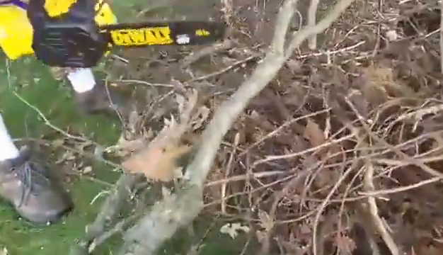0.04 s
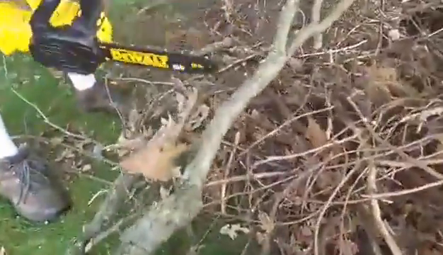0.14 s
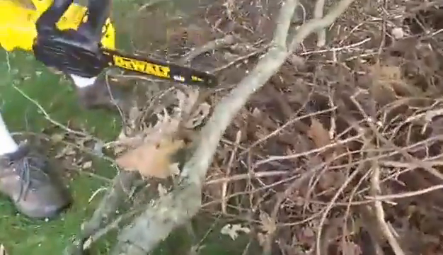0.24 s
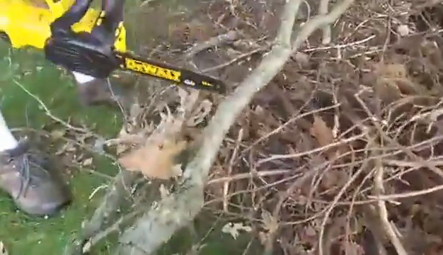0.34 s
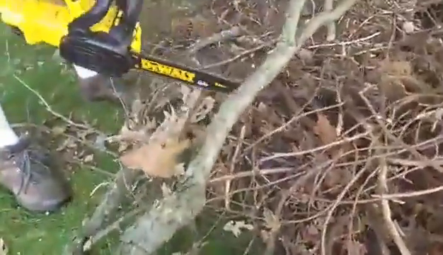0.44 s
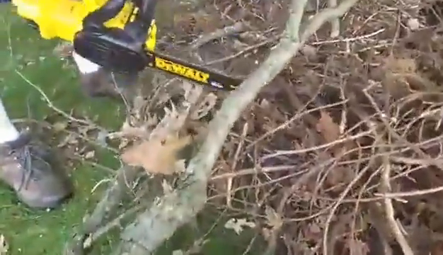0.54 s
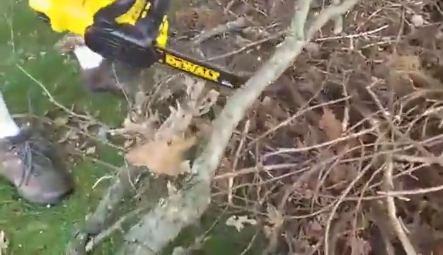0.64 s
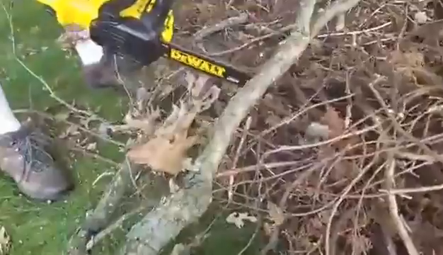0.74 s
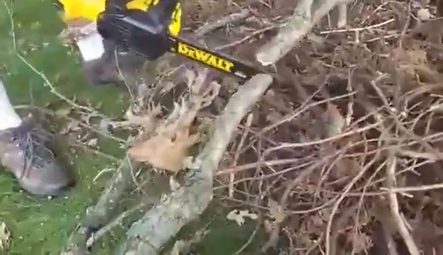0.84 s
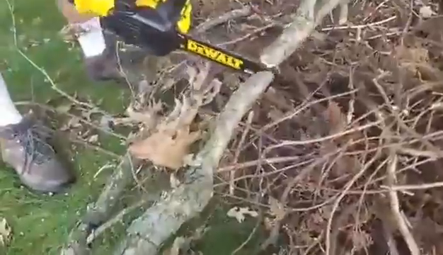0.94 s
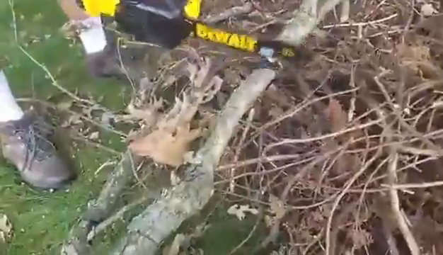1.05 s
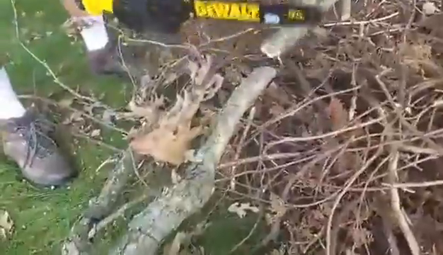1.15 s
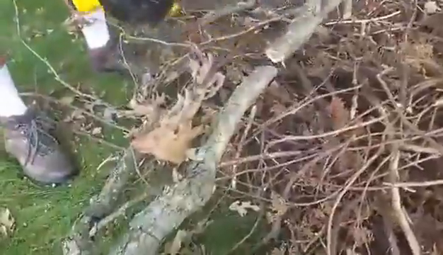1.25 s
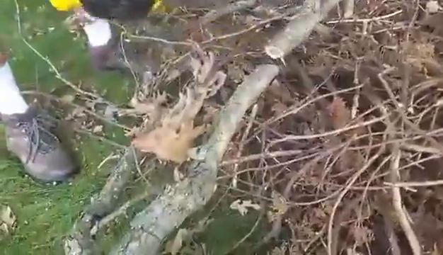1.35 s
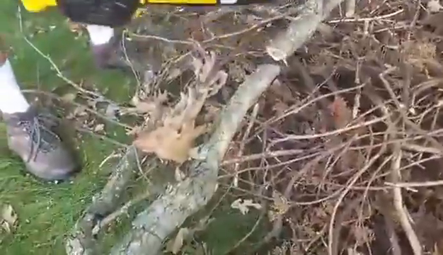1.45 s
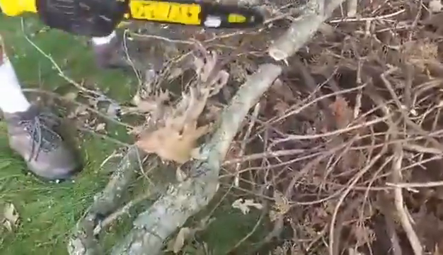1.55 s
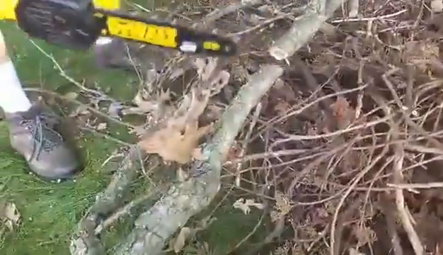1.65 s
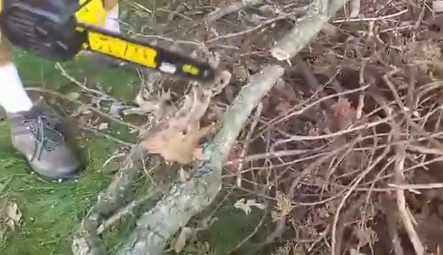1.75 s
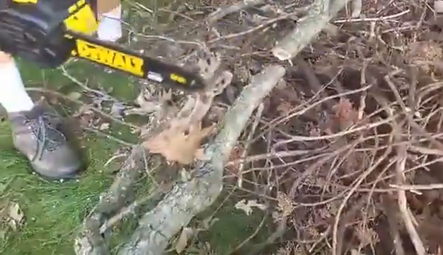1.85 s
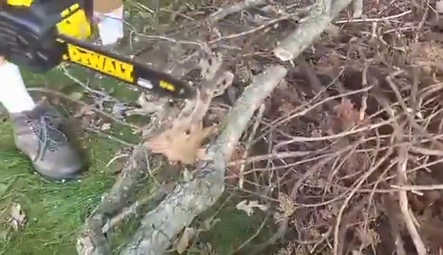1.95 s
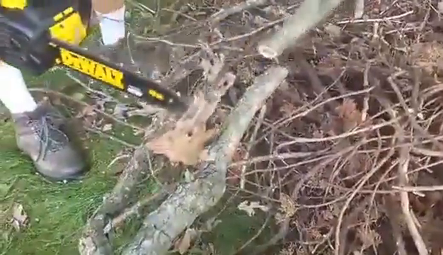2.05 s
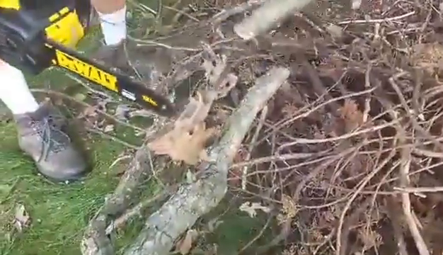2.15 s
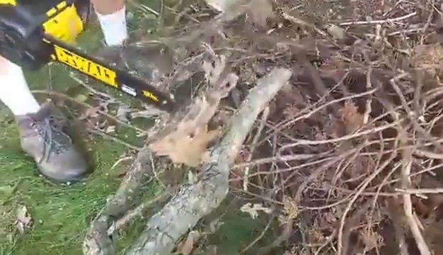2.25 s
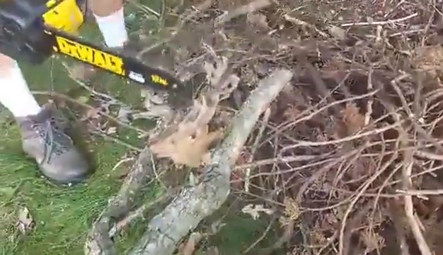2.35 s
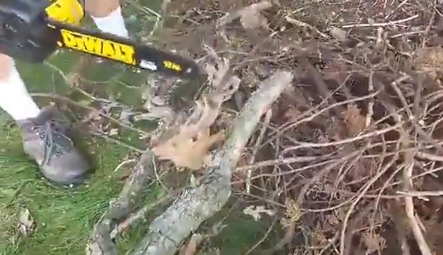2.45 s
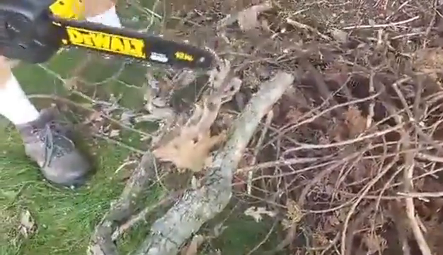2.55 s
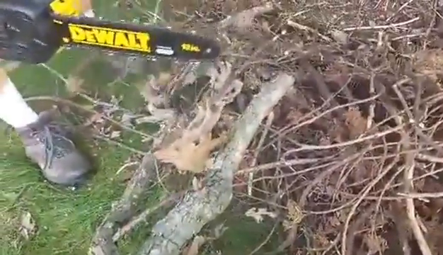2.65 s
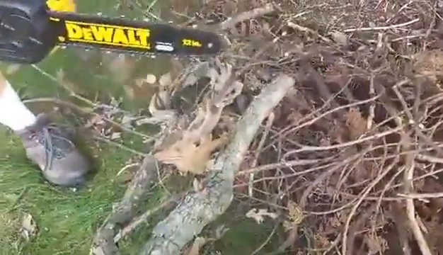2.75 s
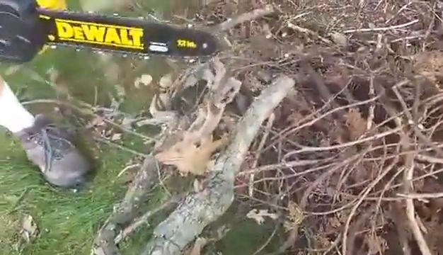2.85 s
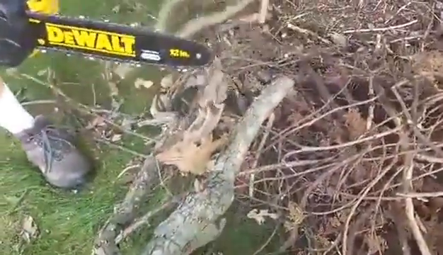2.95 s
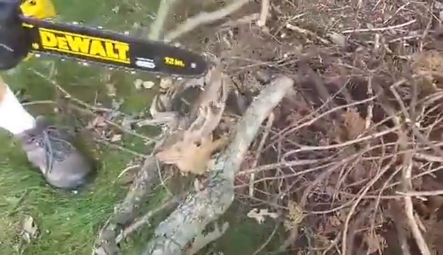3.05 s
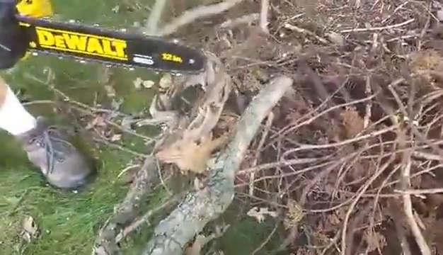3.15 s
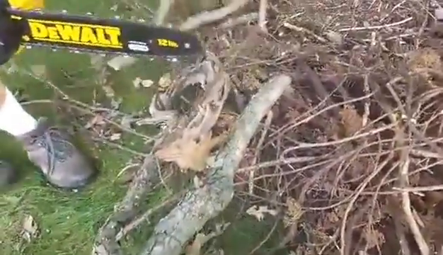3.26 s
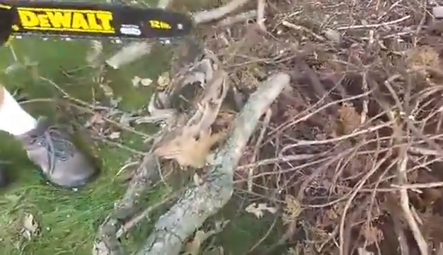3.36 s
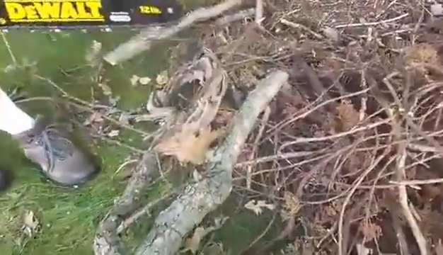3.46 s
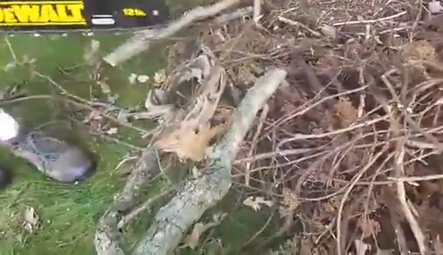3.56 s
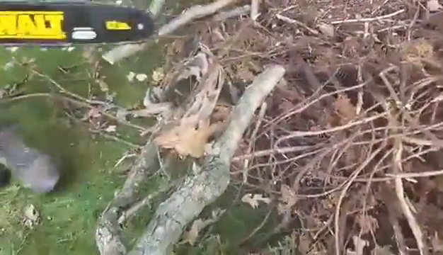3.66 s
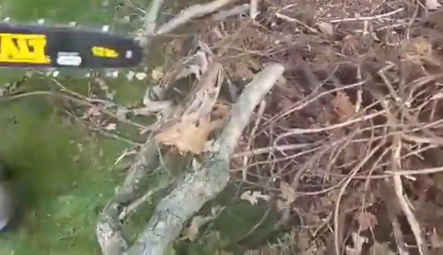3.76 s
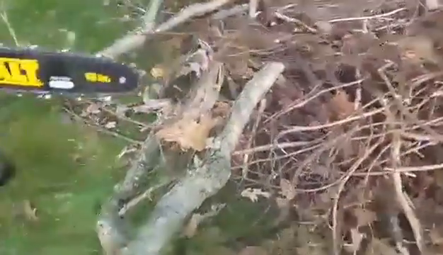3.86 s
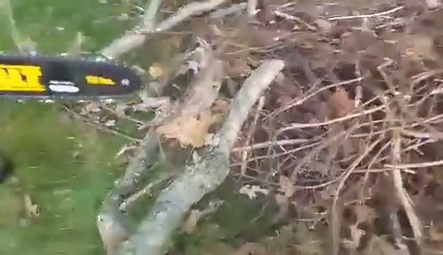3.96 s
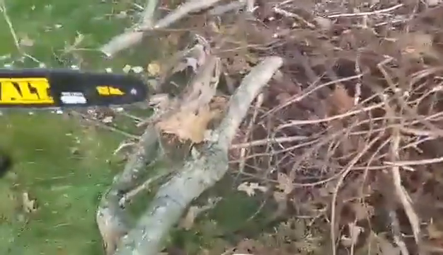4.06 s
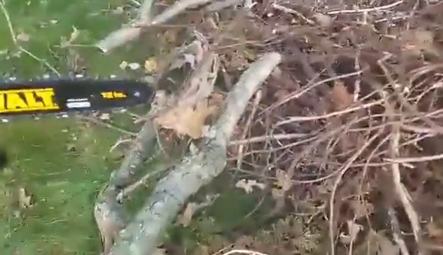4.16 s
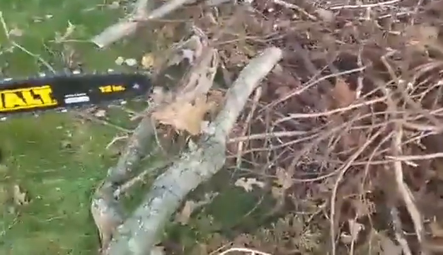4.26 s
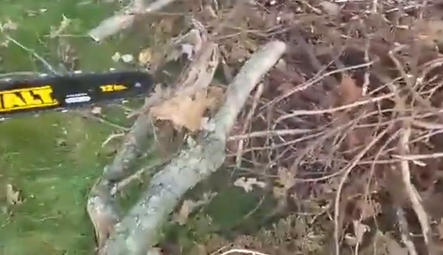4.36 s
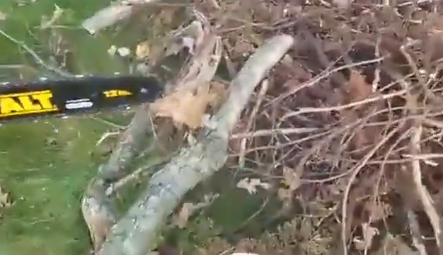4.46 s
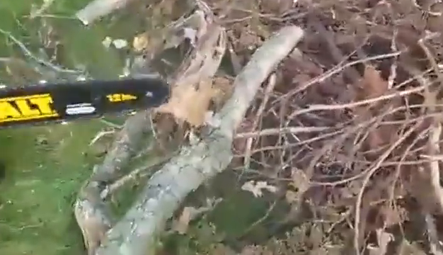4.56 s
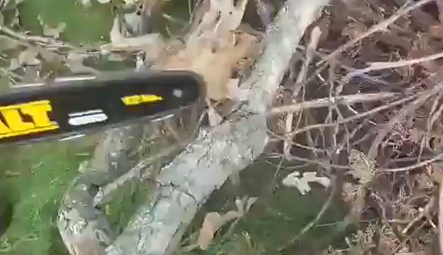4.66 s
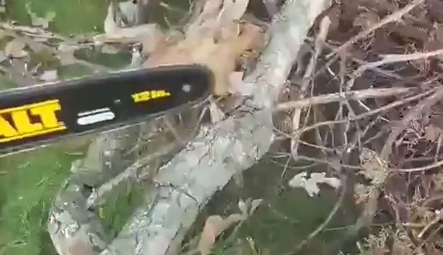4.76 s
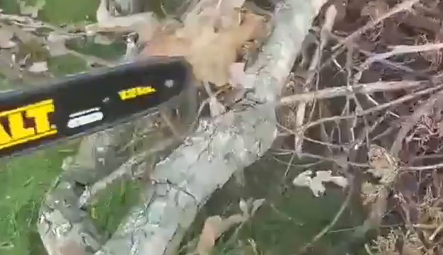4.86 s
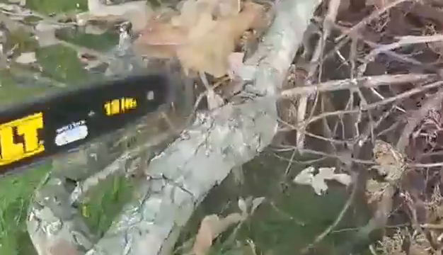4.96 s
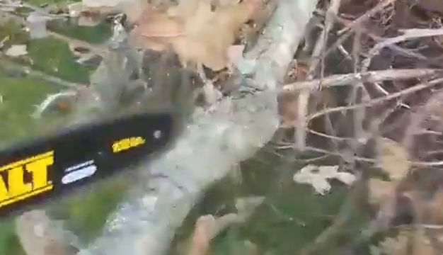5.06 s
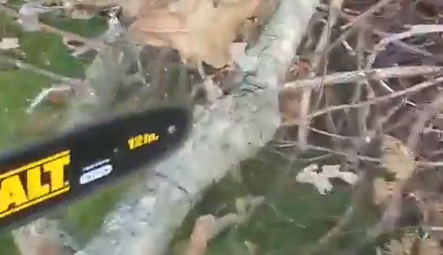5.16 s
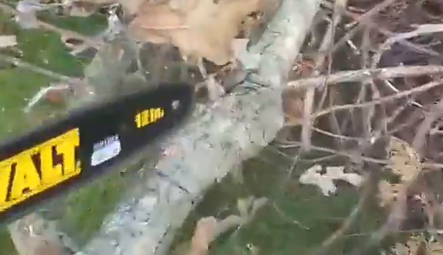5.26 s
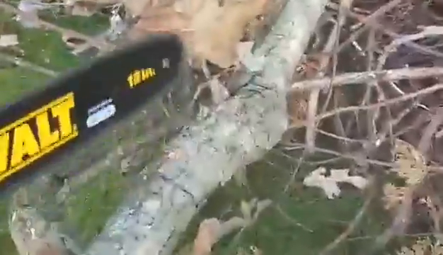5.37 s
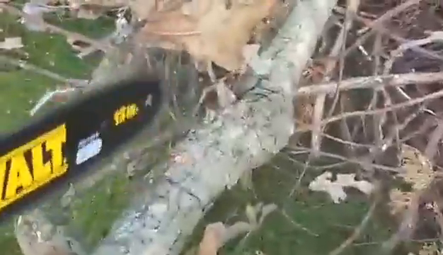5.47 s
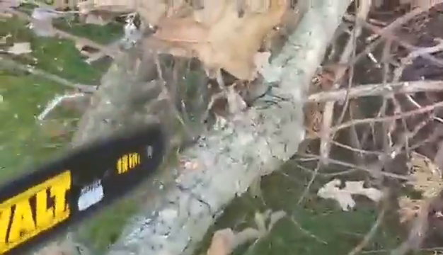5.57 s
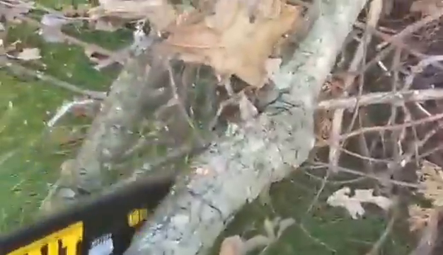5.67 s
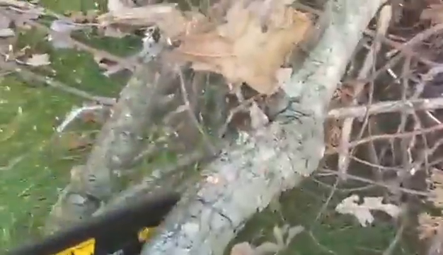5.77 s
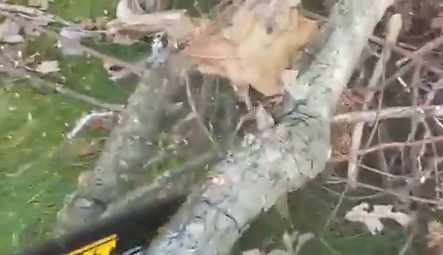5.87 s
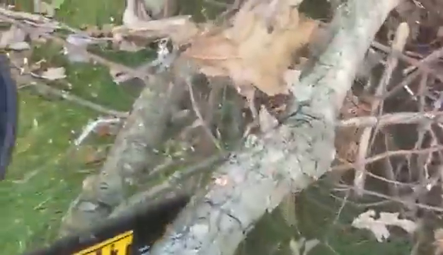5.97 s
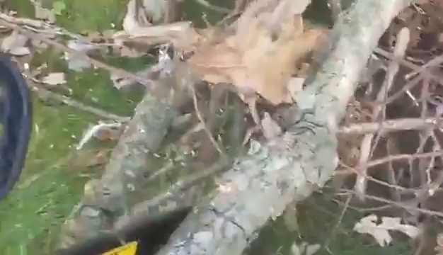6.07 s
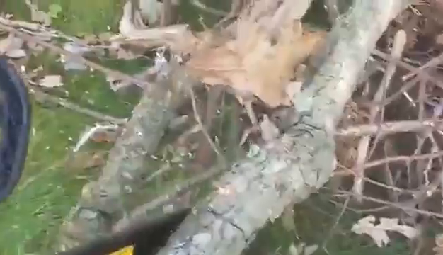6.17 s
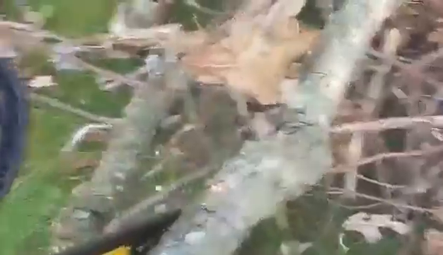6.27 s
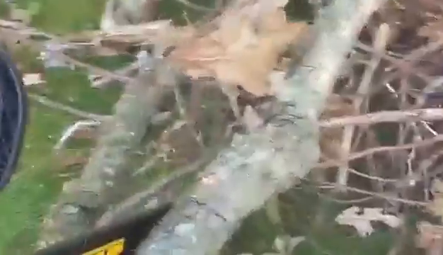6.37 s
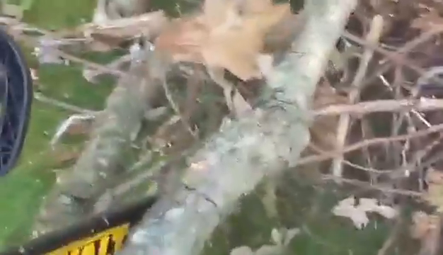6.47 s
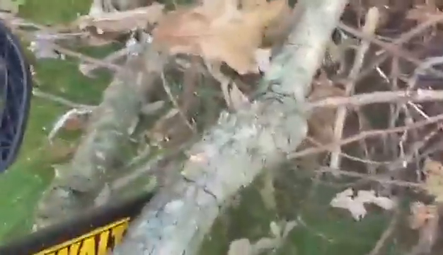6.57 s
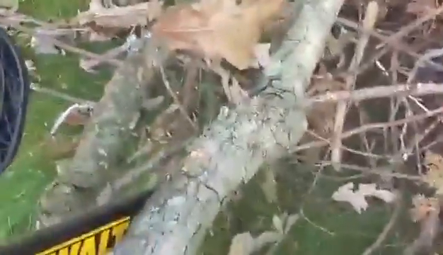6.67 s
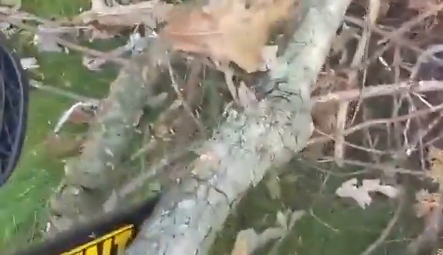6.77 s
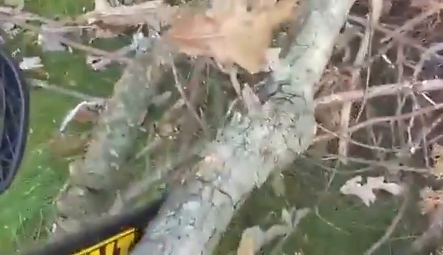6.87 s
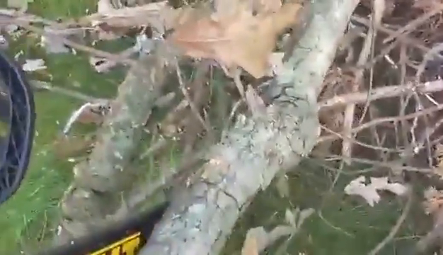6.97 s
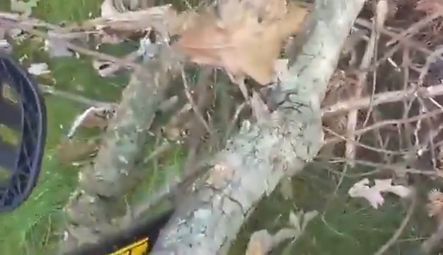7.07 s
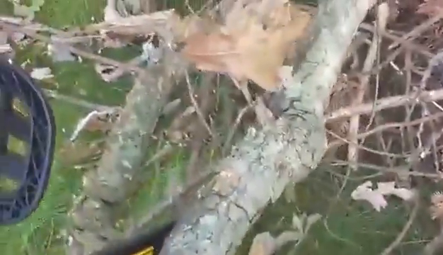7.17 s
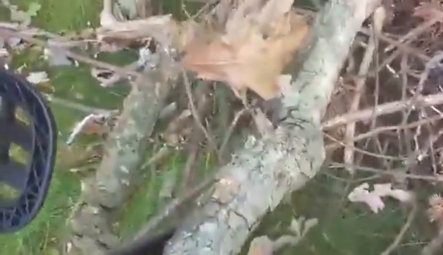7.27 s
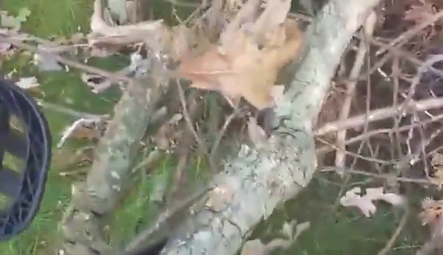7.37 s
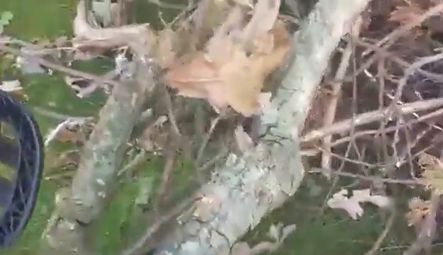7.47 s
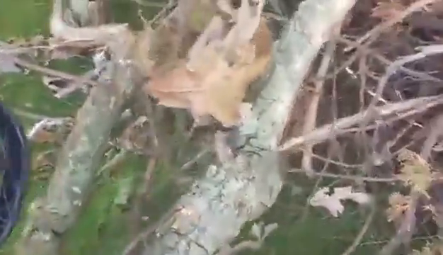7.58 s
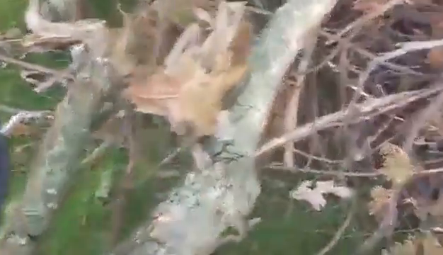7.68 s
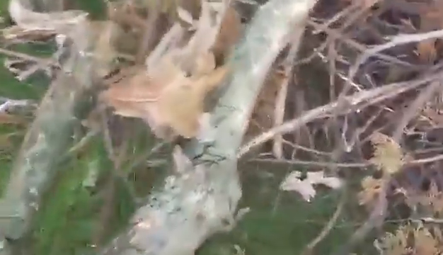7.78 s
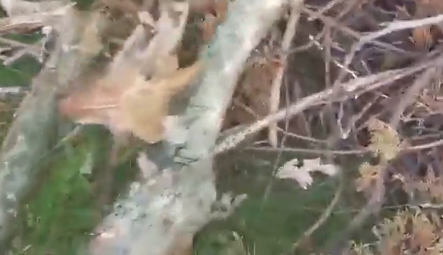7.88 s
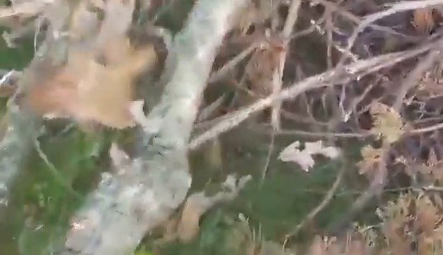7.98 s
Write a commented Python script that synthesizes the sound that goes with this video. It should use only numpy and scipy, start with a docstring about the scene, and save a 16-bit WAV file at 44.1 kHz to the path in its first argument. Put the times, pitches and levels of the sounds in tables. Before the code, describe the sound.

Outdoors, an electric chainsaw makes one quick cut, a branch drags through dry leaves, and a longer cut follows with sagging pitch.

```python
"""A yard; a far engine drones and fades. At 0.5 s a battery chainsaw spins up, nips off a thin branch
and brakes: gears whine, the chain rattles, hisses and rings the bar, cutters chip the wood.
From 2 s the loose branch is dragged through crackling leaves, the engine drops its revs and growls,
and twigs snap underfoot. At 4.8 s the saw starts again; from 5.9 s it sags under a thick branch."""
import sys
import numpy as np
from scipy import signal
from scipy.fft import rfft, irfft, next_fast_len
from scipy.io import wavfile
from scipy.ndimage import uniform_filter1d

SR = 44100
rng = np.random.default_rng(int(sys.argv[2]) if len(sys.argv) > 2 else 0)


def store_wav(level_fs):
    """Save 16-bit WAV to argv[1]."""
    pcm = np.round(np.clip(np.atleast_2d(level_fs), -1, 1) * 32767)
    wavfile.write(sys.argv[1], SR, pcm.T.astype(np.int16))


N = 353682
TIME = np.arange(N) / SR
CUTOFF_HZ = 11400
TOP_RPS = 355  # motor top speed; rps = turns per second

# chain rattle spectrum: (frequency [Hz], level [dB])
CHAIN_SPECTRUM = [(120, -36.5), (260, -11.5), (380, -15.5), (500, 2), (680, 5), (820, -2.5), (1050, 4.5),
                  (2000, 3), (2300, 5.5), (2950, 6.5), (3300, -3.5), (4200, -1.5), (7000, -16)]
# resonances of the loose branch: (frequency [Hz], level [dB])
BRANCH_SPECTRUM = [(150, -21), (830, -2), (1550, 0.5), (1850, 7), (2100, -3), (2680, 4), (3000, -13),
                   (11000, -12)]


def from_db(db):
    return 10 ** (np.asarray(db) / 20)


def unit_rms(x):
    return x / np.sqrt(np.mean(x ** 2) + 1e-20)


def in_time(rows):
    """Table columns interpolated over time."""
    times_s, *columns = np.transpose(rows)
    return [np.interp(TIME, times_s, c) for c in columns]


def at_hz(rows, hz):
    """Table columns interpolated over log frequency."""
    knots_hz, *columns = np.transpose(rows)
    return [np.interp(np.log(hz + 1), np.log(knots_hz), c) for c in columns]


def held(start_s, end_s, attack_s, release_s):
    """Linear attack, hold, release."""
    return np.clip((TIME - start_s) / attack_s, 0, 1) * np.clip(1 - (TIME - end_s) / release_s, 0, 1)


def struck(start_s, db, t60_s, rise_s=0.00092):
    """Impact envelope: fast rise, exponential decay."""
    age_s = TIME - start_s
    return np.clip(age_s / rise_s, 0, 1) * from_db(db - 60 * np.clip(age_s / t60_s, 0, 3))


def drift(corner_hz):
    """Smooth random curve, unit RMS."""
    pole = np.exp(-40 * np.pi * corner_hz / SR)  # runs at SR / 20
    slow = signal.lfilter([1], [1, -2 * pole, pole * pole], rng.standard_normal(N // 20 + 4002))[4000:]
    return np.interp(np.arange(N) / 20, np.arange(len(slow)), unit_rms(slow))


def white():
    """Two independent noises."""
    return rng.standard_normal((2, N))


def grains(per_s, spread_db):
    """Tiny impacts of random time and size."""
    sizes = from_db(spread_db * np.minimum(rng.exponential(1, N), 5))
    return unit_rms(white() * sizes * (rng.random(N) < per_s / SR))


def tone(cycles, lead_rad=0):
    """Stereo sine, left ahead by lead_rad."""
    return np.sqrt(2) * np.sin(2 * np.pi * cycles + np.array([[1], [-1]]) * lead_rad / 2)


def panned(balance_db):
    """Channel gains; positive is left."""
    return from_db(np.array([[.5], [-.5]]) * balance_db)


def port_lead_rad(hz, lead_s):
    """Phase lead of the left microphone port; long waves meet both nearly in step."""
    return 2 * np.pi * hz * lead_s * hz ** 2 / (hz ** 2 + 1000 ** 2)


def causal_response(spectrum, hz, size=8192):
    """Unit-power minimum-phase response: nothing rings before its cause."""
    grid_hz = np.arange(size // 2 + 1) * SR / size
    gain = from_db(at_hz(spectrum, grid_hz)[0]) / (1 + (grid_hz / CUTOFF_HZ) ** 20)
    cepstrum = irfft(np.log(unit_rms(gain)))
    cepstrum[1:size // 2] *= 2
    cepstrum[size // 2 + 1:] = 0
    return np.interp(hz, grid_hz, np.exp(rfft(cepstrum)))


def radiate(pair, spectrum, lead_s=0):
    """Two independent excitations ring through a body and reach both ports."""
    # microphone ports: (frequency [Hz], coherence [ratio], left minus right [dB])
    ports = [(60, 0.28, 1.5), (574, 0.81, 1.5), (1400, 0.59, 0), (2520, 0.048, 6.5), (3530, 0.042, 2),
             (10900, 0.05, 1.5)]
    size = 2 * next_fast_len(N // 2 + SR // 10)
    hz = np.arange(size // 2 + 1) * SR / size
    mid, side = rfft(pair, size) * causal_response(spectrum, hz)
    coherence, balance_db = at_hz(ports, hz)
    stereo = np.sqrt(1 + coherence) * mid + np.array([[1], [-1]]) * np.sqrt(1 - coherence) * side
    left = from_db(balance_db / 2) * np.exp(.5j * port_lead_rad(hz, lead_s))
    return irfft(stereo * [left, 1 / left])[:, :N]


def ground_bounce(x, delay_s=.0045, gain=.3):
    """Ground echo; its delay wanders as the saw moves."""
    lag = delay_s * (1 + .06 * drift(1)) * SR
    echo = np.array([np.interp(np.arange(N) - lag, np.arange(N), side) for side in x])
    return (x + gain * echo) / np.hypot(1, gain)


def yard(growl_hz=262):
    """Outdoor rumble; a far engine drops its revs, runs unevenly and growls as it picks up."""
    # outdoor noise: (frequency [Hz], level [dB])
    air_spectrum = [(25, -11), (150, 3), (270, 5), (370, -4), (750, -8), (2000, -19.5), (2850, -11.5),
                    (3600, -24.5), (11000, -37.5)]
    # engine run: (time [s], fundamental [Hz], level [dB])
    engine_run = [(0, 93.67, -50), (2.05, 94, -50.5), (2.55, 86, -51), (2.8, 77.1, -48),
                  (2.92, 62.3, -42.5), (3.07, 57.4, -52), (3.3, 72.2, -53), (3.65, 63, -50),
                  (4.3, 66.8, -49), (5.5, 65, -64.5)]
    # engine partials: (multiple of fundamental, level [dB])
    orders = [(1, 0), (1.5, -4), (2, 0), (4, -3)]
    # exhaust response: (frequency [Hz], gain [dB])
    exhaust = [(60, -13), (88, 0), (130, 0), (185, -8), (260, -8), (380, -22)]
    hz, level_db = in_time(engine_run)
    cycles = np.cumsum(hz) / SR + .03 * drift(12)
    hum = sum(from_db(db + at_hz(exhaust, order * hz)[0] + 2 * drift(14)) * tone(order * cycles)
              for order, db in orders)
    growl_band = signal.lfilter(*signal.iirpeak(growl_hz, Q=4, fs=SR), radiate(white(), air_spectrum))
    growl = from_db(-47.5) * held(2.6, 3.6, .6, .2) * unit_rms(growl_band)
    air = from_db(-51.5 + drift(0.33)) * radiate(white(), air_spectrum)
    return air + growl + from_db(level_db) * panned(3.9) * hum


def leaves(rest_db=-64.5, drag_db=-6):
    """Dry leaves crackle as branch and feet sweep them; the dragged branch resounds."""
    # sweeps: (start [s], end [s], level [dB], fade [s])
    sweeps = [(0, 0.506, -57, .1), (2.12, 3.42, -46, 0.33), (2.378, 2.796, -41.5, 0.03),
              (2.846, 2.866, -34, 0.045), (2.912, 2.942, -39, 0.033), (2.98, 3.3, -45, 0.22),
              (3.986, 3.996, -38, 0.031), (3.998, 4.024, -50, 0.24)]
    # leaf crackle: (frequency [Hz], level [dB])
    leaf_spectrum = [(250, 2.8), (500, 2.3), (2300, 7), (3400, 6.9), (6000, 9.3), (8500, 0.67),
                     (11000, 0.78)]
    swept = sum(from_db(db) * held(start_s, end_s, 0.11 * fade_s, fade_s)
                for start_s, end_s, db, fade_s in sweeps)
    flutter = from_db(1.6 * drift(50))
    crackle = unit_rms((grains(1500, spread_db=2.6) + 1.4 * white()) * flutter)
    rustle = radiate(crackle * (swept + from_db(rest_db)), leaf_spectrum)
    return rustle + radiate(from_db(drag_db) * swept * flutter * white(), BRANCH_SPECTRUM)


def sticks(ring_db=-3):
    """Twig fibres burst, feet thud on sticks and turf, the loose branch knocks on the pile."""
    # twig snaps: (time [s], level [dB], T60 [s])
    twigs = [(0.403, -30, 0.028), (1.986, -41, 0.047), (2.332, -34, 0.042), (3.472, -32, 0.06),
             (3.855, -36, 0.025), (3.886, -37, .025), (4.306, -25, 0.009), (4.429, -34, .04),
             (4.494, -35, .008), (4.56, -12, 0.0043), (4.719, -26, 0.03)]
    # footfalls: (time [s], level [dB], thud pitch [Hz], relative crack level [dB])
    steps = [(3.961, -26, 650, 2), (3.971, -26.5, 400, 3), (3.982, -23, 210, -7), (4.166, -26.5, 490, -5),
             (4.436, -26, 328, 1), (4.695, -32.5, 304, -2.5)]
    # branch knocks: (time [s], level [dB])
    bumps = [(2.447, -20.5), (2.768, -31)]
    # snap and thud spectra: (frequency [Hz], level [dB])
    twig_spectrum = [(150, -3), (550, 9.5), (1900, 15.5), (4000, 14.5), (11000, 5.5)]
    thud_spectrum = [(45, -22), (200, 3.5), (650, -1.5), (4000, -45)]
    cracks = sum(struck(s, db, t60_s) for s, db, t60_s in twigs)
    thuds = rings = 0
    for s, db, hz, crack_db in steps:
        step = struck(s, db, t60_s=0.025) * panned(-5.5)
        thuds = thuds + step
        cracks = cracks + from_db(crack_db) * step
        rings = rings + from_db(ring_db) * step * tone(hz * (TIME - s))
    knocks = sum(struck(s, db, t60_s=0.039) for s, db in bumps)
    underfoot = radiate(cracks * white(), twig_spectrum) + radiate(thuds * white(), thud_spectrum)
    return underfoot + rings + radiate(knocks * white(), BRANCH_SPECTRUM)


def motor_rps(pressed_s, released_s, spin_up_rps2, feed):
    """The motor crawls in a soft start, ramps up, sags with the feed and brakes on release."""
    crawl_rps, crawl_s, catch_up_s = 68, .08, .045
    ramp_from_rps, sag_rps, brake_rps2 = 83, 56, 1360
    age_s = np.minimum(TIME, released_s) - pressed_s
    ramp_rps = np.minimum(ramp_from_rps + spin_up_rps2 * age_s, TOP_RPS)
    driven_rps = crawl_rps + (ramp_rps - crawl_rps) * np.clip((age_s - crawl_s) / catch_up_s, 0, 1)
    return np.maximum(driven_rps - sag_rps * feed - brake_rps2 * np.maximum(TIME - released_s, 0), 1)


def bar_ring(pull, throb, lead_s):
    """Links strike the steel bar at random and ring its modes."""
    # bar modes: (frequency [Hz], width [Hz], first pull [dB], second pull [dB])
    modes = [(1102, 81, -51, -35.5), (1450, 85, -27, -37), (1723, 56, -24.5, -31.5), (2180, 65, -30, -37.5),
             (2930, 110, -29, -30)]
    strikes = radiate(grains(500, spread_db=1.5) * throb, CHAIN_SPECTRUM, lead_s)
    ring = 0
    for hz, width_hz, *level_db in modes:
        mode = signal.lfilter(*signal.iirpeak(hz, hz / width_hz, fs=SR), strikes)
        ring = ring + from_db(level_db[pull]) * unit_rms(mode)
    return ring


def drive_tones(pull, released_s, rps, turns, load, hum_db, lead_s):
    """Two links meet the sprocket per turn and hum; shaft orders sound while the motor pulls."""
    # shaft orders: (multiple of motor speed, free [dB], thin branch [dB], thick branch [dB])
    orders = [(1, -38, -42.5, -50), (3, -31, -34, -40), (4, -42, -36, -39), (5, -42, -28.5, -39),
              (7, -41, -38, -40), (9, -46, -42, -33)]
    housing_hz, width_hz, low_cut_hz = 1450, 170, 310
    fade_s, db_per_decade = 0.14, 17
    tones = from_db(hum_db + 0.22 * drift(25)) * tone(2 * turns + 0.036 * drift(38))
    pulling = np.clip(1 - (TIME - released_s) / fade_s, 0, 1) * np.clip((rps - 90) / 50, 0, 1)
    speed_db = db_per_decade * np.log10(rps / TOP_RPS)
    for order, free_db, *cutting_db in orders:
        hz = order * rps
        resonance = 1 + 1 / (1 + ((hz - housing_hz) / width_hz) ** 2)
        housing = resonance / (1 + (low_cut_hz / hz) ** 8)
        level_db = free_db + (cutting_db[pull] - free_db) * load + speed_db + 0.97 * drift(42)
        partial = tone(order * turns + 0.017 * drift(25), port_lead_rad(hz, lead_s))
        tones += pulling * housing * from_db(level_db) * partial
    return tones


def gear_whine(rps, turns, load, feed, base_db):
    """Gear teeth sing in the spin-up and in the cut, and go quiet as the motor runs down."""
    # housing response to the whine: (frequency [Hz], gain [dB])
    housing = [(870, -4), (1300, -21), (1680, -10), (2850, -8), (3300, -20), (3750, -22.5), (4100, -18.5),
               (4300, -24)]
    mesh_per_turn = 12.16
    accel_db, load_db, feed_db = 6, 6, 3
    accel = np.clip(uniform_filter1d(np.gradient(rps) * SR, SR // 10) / 400, -3, 1)
    strain_db = accel_db * accel + load_db * load + feed_db * np.minimum(3 * feed, 1)
    level_db = base_db + at_hz(housing, mesh_per_turn * rps)[0] + strain_db + 1.8 * drift(30)
    backlash = .09 * drift(45)
    return from_db(level_db) * tone(mesh_per_turn * turns + backlash, lead_rad=1.6)


def chain_noise(throb, wood_spectrum, hiss_spectrum, lead_s):
    """Rattle, chipping and sliding hiss; the slack chain slaps and the bar bounces in the cut."""
    slap, bounce = drift(37), drift(83)
    links = grains(7000, spread_db=1.0) * throb * unit_rms(from_db(0.8 * slap))
    chips = grains(4000, spread_db=-1.4) * throb * unit_rms(from_db(2 * bounce))
    sliding = white() * throb * unit_rms(from_db(0.82 * (slap + bounce)))
    return (radiate(links, CHAIN_SPECTRUM, lead_s), radiate(chips, wood_spectrum, lead_s),
            radiate(sliding, hiss_spectrum, lead_s))


def chain_clacks(pressed_s, released_s, jerk_db, snag_knocks, lead_s):
    """The chain hits the bar at the starting jerk, at snags and, with a ring, as it stops."""
    # chain against bar: (frequency [Hz], level [dB])
    clack_spectrum = [(150, -17), (620, 5), (1250, 6), (2000, -5), (2900, -7), (11000, -31)]
    jerk = struck(pressed_s, jerk_db, t60_s=0.04)
    stop = struck(released_s + .284, db=-43, t60_s=0.04)
    stop_ring = stop * sum(tone(hz * TIME) for hz in (921, 1690))
    return radiate((jerk + snag_knocks + stop) * white(), clack_spectrum, lead_s) + stop_ring


def saw(pull, wood_spectrum, hiss_spectrum, lead_s):
    """One trigger pull (0 or 1): motor speed and wood contact drive chain, bar and gears."""
    # trigger pulls: (pressed [s], released [s], spin-up [rps/s], jerk [dB], rattle trim [dB],
    # hiss trim [dB], whine trim at crawl [dB], hum trim [dB])
    pulls = [(.505, 1.22, 402, -15, -3.5, -1, -9, -1), (4.819, 8.1, 390, -22.5, 1.9, -0.5, -2.5, 0.5)]
    # chain touches wood: (start [s], end [s], chipping gain [dB])
    contacts = [(0.476, 1.448, -21), (0.8, 1.327, -43), (5.2, 5.327, -34), (5.867, 8.095, -33)]
    # bar pressure on the thick branch: (time [s], feed [1 = full])
    feed_curve = [(5.87, 0), (6.04, .56), (6.25, .57), (6.62, 1.03), (6.71, .78), (6.82, .93), (6.92, .78),
                  (7.06, .88), (7.55, .7), (7.72, .74), (7.85, .33)]
    # snags that knock the bar and trip the motor: (time [s], level [dB])
    snags = [(.772, -25), (.897, -17), (1.451, -25.5), (6.443, -17), (6.699, -15.5), (7.138, -15),
             (7.254, -15.5)]
    # gains by motor speed: (speed [rps], rattle [dB], wood [dB], hiss [dB], link hum [dB])
    speed_gains = [(20.1, -54, -16, -39, -65), (71.4, -24, -13.5, -7, -56), (196, -19, -5, 1, -54),
                   (258, -22, -1, 1.5, -27), (312, -23.5, -1, 2, -24.5), (384, -27, -5.5, 1.5, -31.5)]
    # throb of cutters and sprocket: (multiple of motor speed, depth [dB])
    throb_orders = [(1 / 2, .5), (2 / 3, .7), (1, .4)]
    bite_s, clear_s, stumble_rps, feed_db = 0.045, 0.14, 6, 9.5
    pressed_s, released_s, spin_up_rps2, jerk_db, *trims_db = pulls[pull]
    rattle_trim_db, hiss_trim_db, crawl_db, hum_trim_db = trims_db

    feed, = in_time(feed_curve)
    contact = sum(from_db(db) * held(start_s, end_s, bite_s, clear_s) for start_s, end_s, db in contacts)
    load = np.max([held(start_s, end_s, bite_s, clear_s) for start_s, end_s, _ in contacts], axis=0)
    stumble = sum(held(s, s + .025, .025, .05) for s, _ in snags)
    rps = np.maximum(motor_rps(pressed_s, released_s, spin_up_rps2, feed) - stumble_rps * stumble, 1)
    rps *= 1 + (0.002 * load + 0.003 * feed) * drift(12)
    turns = np.cumsum(rps) / SR
    running = (TIME >= pressed_s) * np.clip((rps - 2) / 20, 0, 1)
    crawling = np.clip((120 - rps) / 30, 0, 1)

    rattle_db, wood_db, hiss_db, hum_db = at_hz(speed_gains, rps)
    rattle_db += rattle_trim_db
    throb = unit_rms(from_db(sum(db * np.cos(2 * np.pi * order * turns) for order, db in throb_orders)))
    rattle, chipping, hiss = chain_noise(throb, wood_spectrum, hiss_spectrum, lead_s)
    noise = (from_db(rattle_db - 3.5) * rattle
             + contact * from_db(wood_db + feed_db * feed) * chipping
             + from_db(hiss_db + hiss_trim_db - 29) * hiss)
    ring = from_db(wood_db) * bar_ring(pull, throb, lead_s)
    drive = drive_tones(pull, released_s, rps, turns, load, hum_db + hum_trim_db, lead_s)
    whine = gear_whine(rps, turns, load, feed, rattle_db + crawl_db * crawling)
    sustained = running * (ground_bounce(noise) + ring + drive + whine)
    snag_knocks = running * sum(struck(s, db, t60_s=0.041) for s, db in snags)
    return sustained + chain_clacks(pressed_s, released_s, jerk_db, snag_knocks, lead_s)


def scene():
    """Two cuts, the handling between them, the yard."""
    # chipping spectra of the branches: (frequency [Hz], level [dB])
    thin_branch = [(110, -73), (550, -11), (1030, -14), (1250, 0), (1450, 2.5), (1580, -7.5), (1780, -2),
                   (2100, -6.5), (4000, -21.5)]
    thick_branch = [(120, -42), (550, -5), (800, -10.5), (1100, 1.5), (1700, -4), (2050, -12), (4000, -22)]
    # hiss of the sliding chain: (frequency [Hz], level [dB])
    hiss_far = [(300, -50), (4200, 0), (5100, 0.5), (6000, 6), (7300, -3), (10800, -6)]
    hiss_near = [(300, -63), (5200, -16), (6100, -5), (7200, -4.5), (8000, -2.5), (8700, -7), (10800, -10)]
    lead_s = 0.000222  # the saw is on the left
    thin_cut = saw(0, thin_branch, hiss_far, lead_s / 2)
    thick_cut = saw(1, thick_branch, hiss_near, lead_s)
    return thin_cut + thick_cut + leaves() + sticks() + yard()


def record(dry):
    """Soft peak limit, then a steep low-pass."""
    peak_limit = 0.52
    rounded = dry / (1 + (dry / peak_limit) ** 6) ** (1 / 6)
    return signal.sosfilt(signal.ellip(10, .2, 70, CUTOFF_HZ, fs=SR, output="sos"), rounded)


dry = scene()
out = record(dry)
store_wav(out)
```